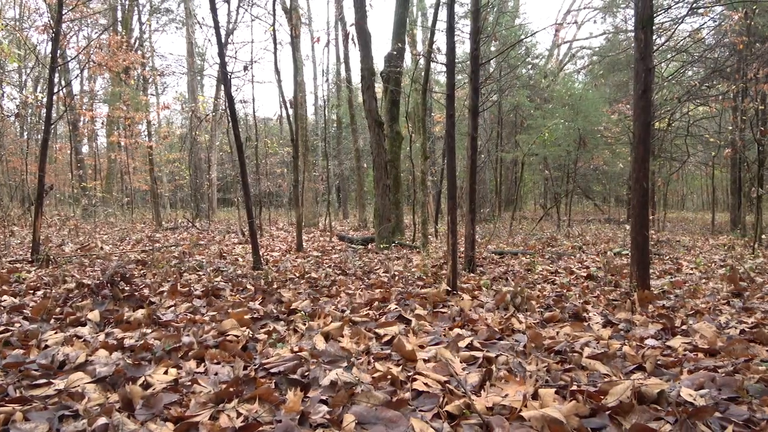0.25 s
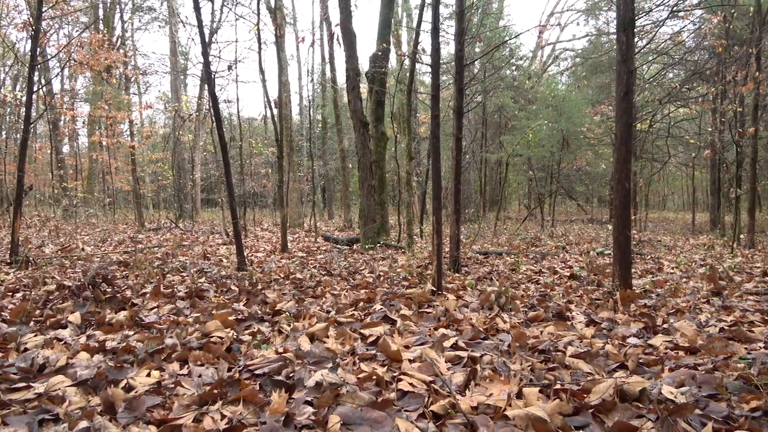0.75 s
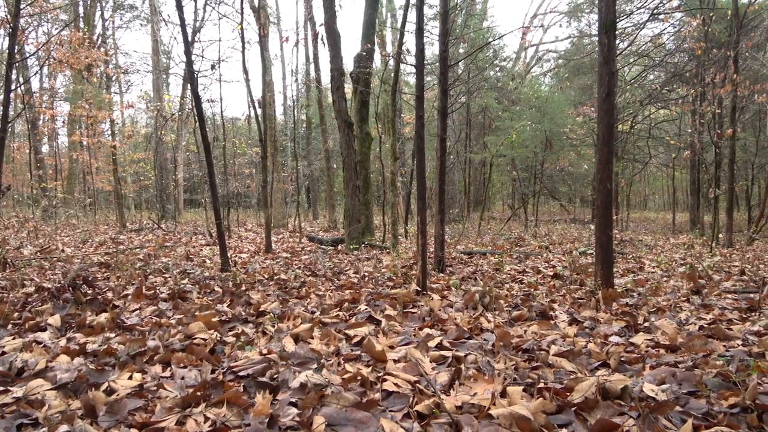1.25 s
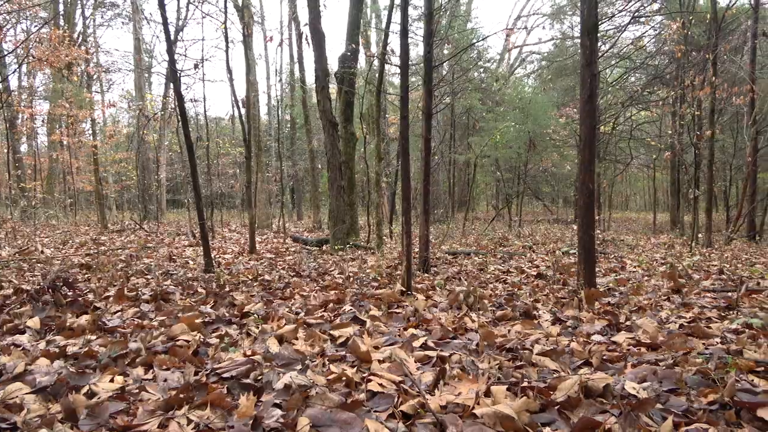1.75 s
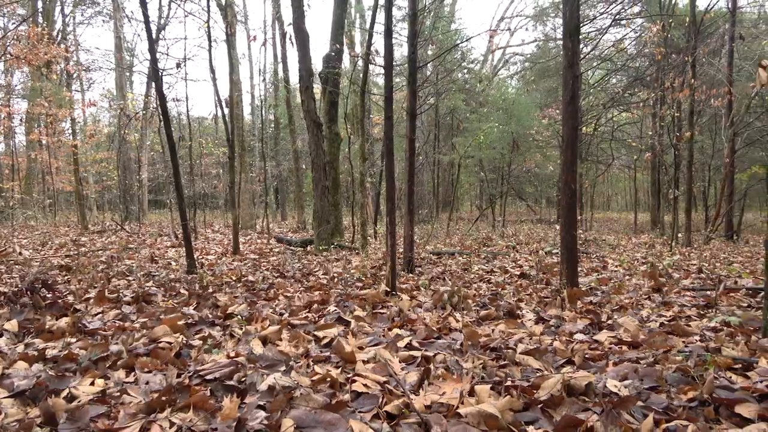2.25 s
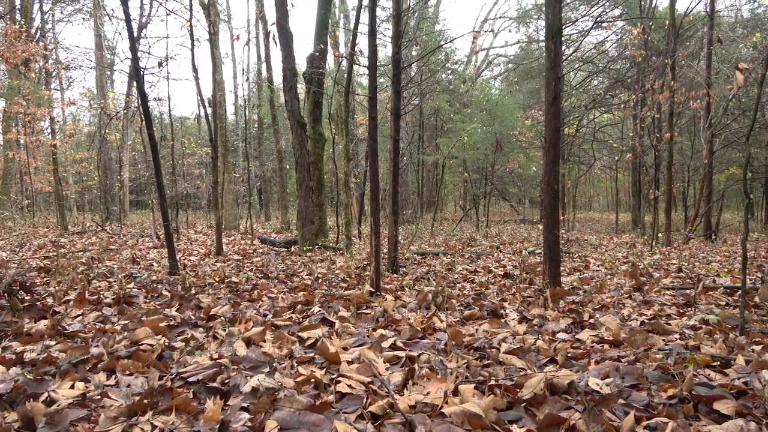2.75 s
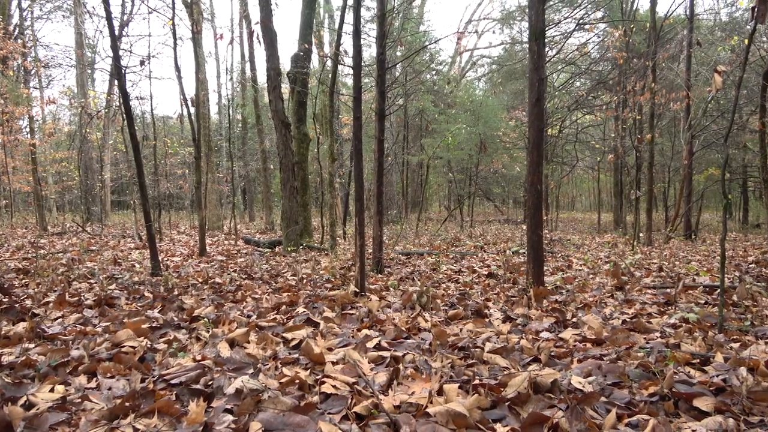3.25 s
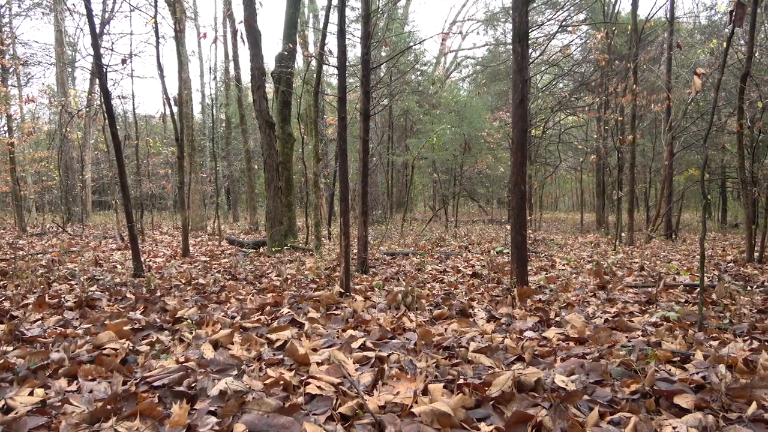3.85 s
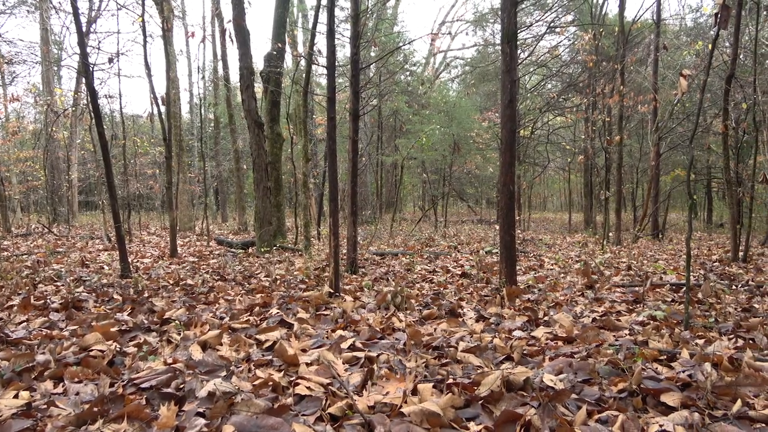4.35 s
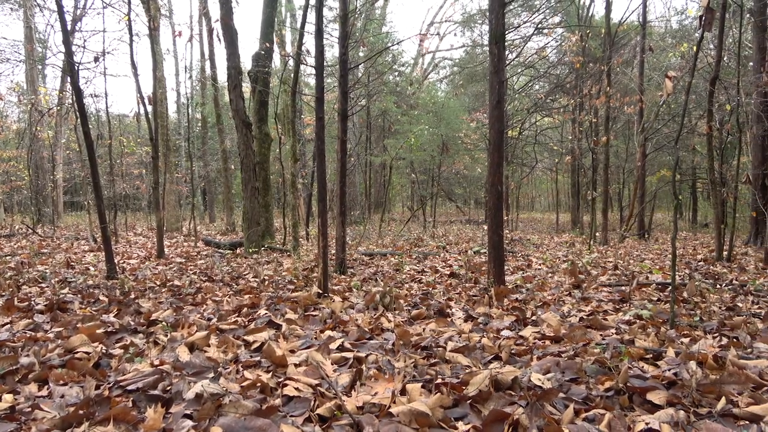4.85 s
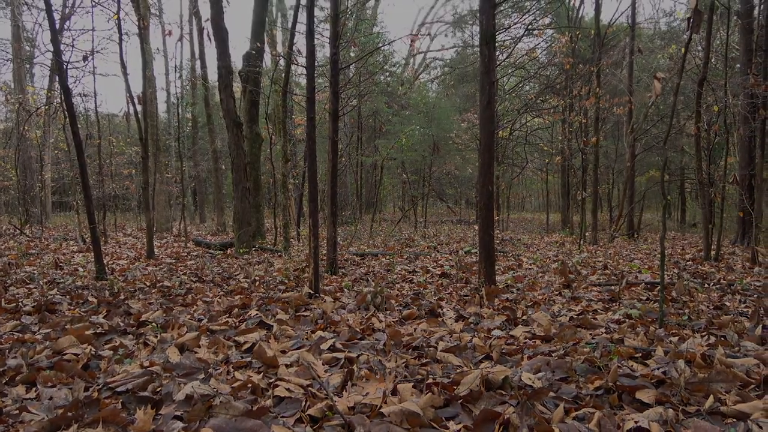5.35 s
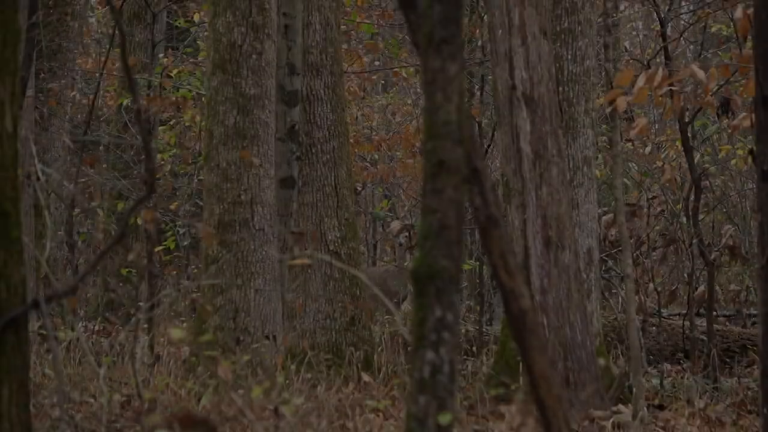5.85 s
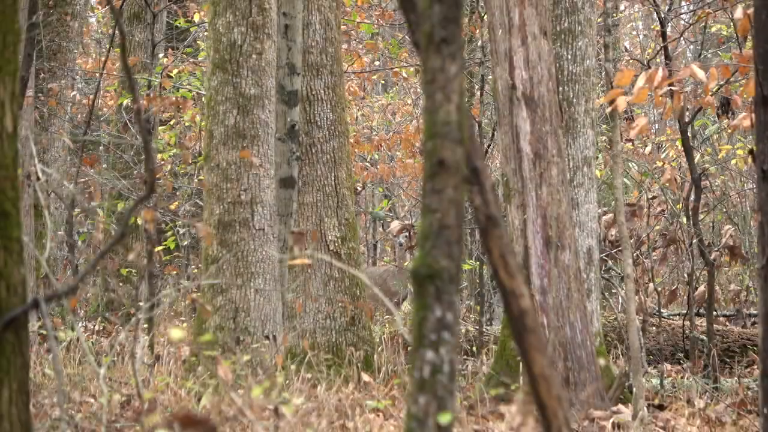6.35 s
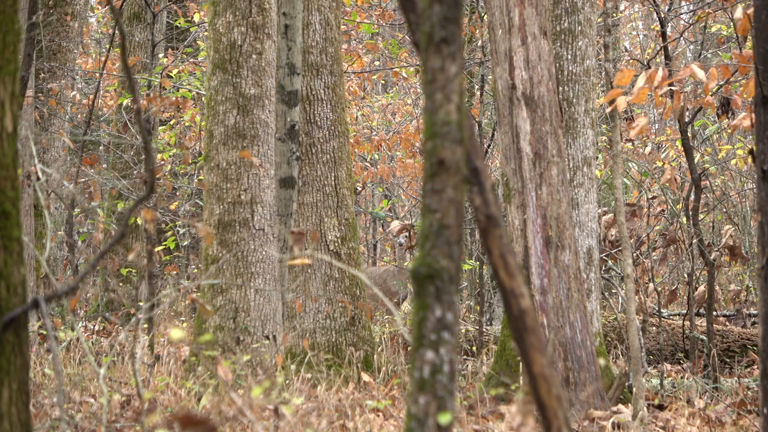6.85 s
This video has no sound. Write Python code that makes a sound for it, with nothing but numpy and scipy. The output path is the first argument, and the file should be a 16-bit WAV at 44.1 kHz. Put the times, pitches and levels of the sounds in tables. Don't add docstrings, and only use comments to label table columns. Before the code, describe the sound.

Sparse small bird whistles and clucks echo through a quiet wood over a faint traffic rumble; one sharp leaf snap, later a distant hoarse jay.

```python
import sys
import numpy as np
from scipy import signal
from scipy.io import wavfile
from scipy.ndimage import uniform_filter1d

SR = 44100
rng = np.random.default_rng(int(sys.argv[2]) if len(sys.argv) > 2 else 0)


def to_linear_factor(level_db):
    exponent = np.asarray(level_db, float) / 20
    return 10 ** exponent


def dump(signal):
    limited = np.clip(np.atleast_2d(signal).T, -1, 1)
    pcm = np.round(limited * 32767).astype(np.int16)
    wavfile.write(sys.argv[1], SR, pcm)


N = 313992


def evened(x):
    return x / np.sqrt(np.mean(x ** 2) + 1e-20)


def drift(count, size):
    return evened(uniform_filter1d(uniform_filter1d(rng.standard_normal(count), size=size), size=size))


def columns(rows, t):
    s, *rest = np.transpose(rows)
    return [np.interp(t, s, c) for c in rest]


def add(mix, s, sound):
    part = mix[round(s * SR):][:len(sound)]
    part += sound[:len(part)]


def bell(t, peak_s, half_s):
    return np.exp(-abs((t - peak_s) / half_s) ** 2.6)


def resonate(x, hz, width):
    turn = np.exp(2j * np.pi * np.cumsum(hz * np.ones(len(x))) / SR)
    r = np.exp(-np.pi * width / SR)
    return 2 * (turn * signal.lfilter([1 - r], [1, -r], x / turn + 1e-18)).real


def tone(hz, orders_db, edge_s=1):
    turn = 2 * np.pi * np.cumsum(hz) / SR
    wave = sum(to_linear_factor(db) * np.sin((k + 1) * turn) for k, db in enumerate(orders_db))
    return np.sqrt(2) * wave * signal.windows.tukey(len(hz), min(.35, 2 * edge_s * SR / len(hz)))


def swelling(hz, t):
    # (centre [Hz], spread [log ratio])
    bands = [
        (24, .4),
        (315, 0.55),
        (620, 0.37),
        (2400, 0.57),
        (182, 0.18),
        (1330, 0.1),
    ]
    # (band counted from 0, peak [s], half length [s], rise [dB])
    swells = [(0, .02, .08, 12), (0, .8, .5, 7.5), (0, 1.57, .12, 7), (0, 2.15, .3, 10), (0, 2.62, .1, 14),
              (0, 4.12, 0.24, 9), (0, 5.13, 0.15, 8), (0, 5.49, .08, 9), (0, 6.7, .5, -5),
              (1, 2.37, .35, 2), (1, 5.77, 0.39, 6), (2, 2.38, 0.29, 4), (2, 4.42, .15, 2), (2, 5.6, .2, 2),
              (2, 6.6, 0.85, -2), (3, 1.1, 0.43, 2.5), (3, 2.2, 0.15, -3), (3, 4.12, 0.21, 3),
              (3, 5.35, 0.13, 4), (3, 5.945, 0.26, 8), (4, 6.3, .8, -4)]
    log_hz = np.log(hz[:, None] + 1)
    reach = [np.exp(-((log_hz - np.log(centre_hz)) / spread) ** 2) for centre_hz, spread in bands]
    steady_db = [-2.5, 0.8, 1.1, 0.54, 0.4, 1.4]
    gap_db = -1.9 * np.exp(-((log_hz - np.log(42)) / 0.31) ** 2)
    field_db = gap_db + sum(r * db for r, db in zip(reach, steady_db))
    for band, peak_s, half_s, db in swells:
        field_db = field_db + reach[round(band)] * db * bell(t, peak_s, half_s)
    return field_db


def hiss(spectrum, patchy_db, swells=False):
    frames, hz = N // 512 + 5, np.fft.rfftfreq(2048, 1 / SR)
    a, b, patches = rng.standard_normal((frames, len(hz), 3)).T
    patches = evened(uniform_filter1d(uniform_filter1d(patches, size=20, axis=0), size=8, axis=1))
    f, level_db = np.transpose(spectrum)
    field_db = np.interp(np.log(hz + 1), np.log(f + 1), level_db)[:, None] + patchy_db * patches
    if swells:
        field_db += swelling(hz, np.arange(frames) * 512 / SR)
    return evened(signal.istft((a + 1j * b) * to_linear_factor(field_db), nperseg=2048, noverlap=1536)[1][:N])


def port_hiss():
    # (frequency [Hz], density [dB per Hz])
    ports = [(12, -16), (20, -3), (58, -9), (134, -23), (434, -4.5), (1000, -9.5), (1610, -13),
             (2460, -10.5), (5380, -10.5), (7110, -7.5), (11000, -5.5), (16000, -7.5)]
    return to_linear_factor(-64.5) * hiss(ports, 0.71)


def wood_air():
    # (frequency [Hz], density [dB per Hz])
    air = [(12, -33), (20, -3.5), (74, 0), (123, -1), (150, -4.5), (216, -14.5), (310, -19), (738, -21.5),
           (2600, -29.5), (4540, -29), (5230, -29.5), (5850, -32), (7730, -36.5), (14700, -38),
           (16000, -34)]
    return to_linear_factor(-42) * hiss(air, 0.96, swells=True)


def drones():
    # (pitch [Hz], or 1 to follow the gear; width [Hz])
    engines = [
        (84.55, 2.5),
        (101.6, 1.33),
        (1, 3),
        (160.2, 1.5),
    ]
    # (time [s], pitch [Hz])
    gear = [
        (0, 120.7),
        (4.3, 120.2),
        (4.5, 131.9),
        (5.5, 132.2),
        (5.8, 122),
    ]
    idle_db = [-57, -63, -60, -64]
    # (engine counted from 0, nearest [s], half length [s], level [dB])
    passes = [(0, 0.27, 0.092, -38.5), (0, 0.55, 0.17, -38.5), (0, 1.55, .45, -45), (0, 2.46, 0.21, -47.5),
              (0, 4.38, .16, -42.5), (0, 5.08, 0.12, -49), (0, 6.43, 0.99, -45), (1, 0.33, .2, -53),
              (1, 1.95, 0.073, -45), (1, 3.24, 0.13, -52), (1, 4.08, .14, -51), (1, 5.2, 0.37, -50),
              (1, 5.68, .08, -44), (1, 6.42, 0.71, -36.5), (2, .2, .3, -48), (2, 1.2, 0.27, -51),
              (2, 2.9, 1.0, -51), (2, 4.64, .15, -44.5), (2, 5.04, 0.25, -44), (2, 5.6, .4, -55),
              (2, 6.92, .12, -51), (3, .4, .12, -53), (3, 1.45, 0.39, -52.5), (3, 2.57, 0.54, -48),
              (3, 3.96, 0.32, -45.5), (3, 4.96, 0.23, -46)]
    t, out = np.arange(N) / SR, 0
    levels = to_linear_factor(idle_db)[:, None] * np.ones(N)
    for engine, s, half_s, db in passes:
        levels[round(engine)] += to_linear_factor(db) * bell(t, s, half_s)
    for (hz, width), level in zip(engines, levels):
        hz = hz if hz > 2 else columns(gear, t)[0]
        halo = evened(resonate(resonate(rng.standard_normal(N), hz, 3 * width), hz, 3 * width))
        line = np.sqrt(2) * np.sin(2 * np.pi * np.cumsum(hz + .2 * width * drift(N, 9000)) / SR)
        out = out + to_linear_factor(-3.0) * level * (0.82 * line + 0.4 * halo)
    return out


def insects():
    hz, width = 5280, 300
    return to_linear_factor(-66.5) * evened(resonate(resonate(rng.standard_normal(N), hz, width), hz, width))


def trees(x, t60):
    taps = np.zeros(SR)
    at = np.arange(100, SR - 20, 20) + rng.integers(0, 20, (SR - 101) // 20)
    taps[at] = rng.choice([-1., 1.], len(at)) * to_linear_factor(-60 * at / SR / t60)
    return signal.fftconvolve(x, taps / np.linalg.norm(taps))[:N]


def jay_scold():
    # (time [s], level [dB], upper throat [Hz])
    voice = [(5.655, -55, 3180), (5.69, -46.5, 3120), (5.74, -48.5, 2930), (5.985, -45, 3230),
             (6.115, -45, 3490), (6.185, -49, 3470), (6.403, -51, 3640), (6.55, -55.5, 3600),
             (6.98, -55.5, 3700)]
    # (time [s], length [s], start [Hz], end [Hz], level [dB])
    strands = [(5.67, 0.247, 3130, 3170, -53), (5.84, .14, 3250, 3320, -51.5), (5.9, 0.14, 3540, 3520, -51),
               (6.11, 0.143, 3570, 3470, -51.5), (5.7, 0.11, 2920, 2900, -59),
               (5.85, 0.25, 2850, 2800, -57), (5.74, 0.141, 1750, 1800, -61), (5.94, .08, 2000, 2200, -59),
               (6.02, 0.12, 2080, 2000, -57), (6.14, 0.122, 1780, 1720, -60), (5.6, 0.042, 1320, 1260, -57),
               (6.14, 0.122, 1220, 1100, -60), (6.18, 0.144, 3950, 4000, -64),
               (6.27, .13, 1440, 1400, -62.5)]
    t = np.arange(voice[0][0], voice[-1][0], 1 / SR)
    db, throat_hz = columns(voice, t)
    jitter = uniform_filter1d(rng.standard_normal(len(t)), size=150)
    turns = np.cumsum(190 * (1 + 1.2 * jitter)) / SR
    puffs = (0.53 + np.exp(-(turns % 1) / 0.33)) * rng.standard_normal(len(t))
    upper = resonate(resonate(puffs, 0.98 * throat_hz, 1200), throat_hz, 1200)
    upper = evened(resonate(upper, 2900, 1700))
    lower = evened(resonate(resonate(puffs, 2100, 900), 2100, 900))
    flutter = evened(uniform_filter1d(rng.standard_normal(len(t)), size=1500))
    lower_db = -5 - 4.5 * (t - t[0]) + 3 * flutter
    out = np.zeros(N)
    add(out, t[0], to_linear_factor(db - 3.0) * (upper + to_linear_factor(lower_db) * lower) * signal.windows.tukey(len(t), .02))
    unsteady = rng.standard_normal(SR)
    for s, length, start_hz, end_hz, strand_db in strands:
        hz = np.linspace(start_hz, end_hz, round(length * SR))
        breath = np.roll(unsteady, -round(start_hz))[:len(hz)]
        breath = evened(resonate(breath, hz, 40)) * np.hanning(len(hz))
        add(out, s, to_linear_factor(strand_db + 3.0) * (0.6 * tone(hz, [0]) + 0.66 * breath))
    return out


def jay_note():
    hz, length = 1592, .1
    return to_linear_factor(-62) * tone(np.linspace(hz, .995 * hz, round(length * SR)), [-15, 0, -15])


def clucks():
    # (time [s], head [dB], plateau [dB], fall [dB], low arch [dB])
    calls = [(0.101, -82, -78, -85, -67.5), (.892, -65, -61.5, -65, -64.5), (1.202, -63, -77, -67, -62.5),
             (1.52, -63, -70, -67, -64.5), (4.375, -62, -69, -68, -68), (4.722, -63, -65, -67, -68),
             (5.085, -64, -63.5, -72, -72)]
    # (delay [s], length [s], start [Hz], middle [Hz], end [Hz])
    parts = [
        (0, .018, 3800, 4050, 4350),
        (.011, .018, 3500, 3300, 3050),
        (.022, .024, 2900, 2550, 2200),
        (.002, .045, 1280, 1580, 1230),
    ]
    out = np.zeros(N)
    for s, *levels_db in calls:
        detune = 1 + .02 * rng.standard_normal()
        for (delay, length, start_hz, middle_hz, end_hz), db in zip(parts, levels_db):
            u = np.linspace(-1, 1, round(length * SR))
            arch = ((end_hz + start_hz) / 2 - middle_hz) * u ** 2
            bend = middle_hz + (end_hz - start_hz) / 2 * u + arch
            add(out, s + delay, to_linear_factor(db + 2.0) * tone(bend * detune, [0]))
    return out


def whistles():
    # (time [s], length [s], start [Hz], end [Hz], level [dB])
    near = [(0.721, .055, 422, 420, -62), (1.067, 0.035, 417, 420, -60.5), (3.488, 0.015, 9750, 9650, -68),
            (3.517, .013, 7350, 7250, -57.5), (4.848, 0.16, 2734, 2750, -70.5),
            (5.346, 0.051, 2290, 2285, -60.5)]
    middle = [(.62, .12, 6430, 6350, -76), (2.2, .2, 700, 624, -67.5), (2.43, .043, 2110, 2163, -65.5),
              (3.502, 0.021, 9000, 7200, -66), (3.597, .015, 4300, 2300, -60),
              (3.92, .043, 2240, 2166, -64), (6.42, 0.13, 3646, 3600, -67), (6.6, .11, 3600, 3650, -74),
              (6.89, .05, 7100, 7020, -69), (6.95, .16, 7050, 7050, -79)]
    far = [(1.36, .06, 7650, 7420, -78), (.742, 0.028, 3930, 4100, -76), (.799, .03, 4400, 3590, -75),
           (.84, .03, 3600, 4320, -76), (3.8, .3, 4240, 4400, -83.5), (4.05, .06, 2400, 1890, -80),
           (4.17, 0.059, 2360, 2050, -81), (5.271, .032, 3210, 2600, -68), (5.351, 0.017, 3000, 4260, -70)]
    # (time [s], hold [s], top [Hz], bottom [Hz], level [dB])
    slides = [(.223, 0, 7500, 7160, -76), (2.28, 0.081, 8700, 7900, -76), (3.3, 0.0023, 9240, 7120, -58),
              (4.459, .045, 8850, 7400, -67.5), (5.065, 0, 8800, 7650, -72.5)]
    # (time [s], pitch [Hz], level [dB])
    chip = [
        (3.66, 6020, -55),
        (3.667, 6950, -51),
        (3.686, 6500, -53),
        (3.699, 5250, -54),
    ]
    hook = [
        (5.562, 8200, -69),
        (5.575, 6940, -54),
        (5.594, 7300, -52),
        (5.6, 7010, -65),
        (5.75, 7070, -75),
    ]
    for notes, echo_db in [(near, -5.5), (middle, 1.5), (far, 12.5)]:
        for s, length, start_hz, end_hz, db in notes:
            hz = np.linspace(start_hz, end_hz, round(length * SR))
            yield s, hz, db, echo_db, hz.max() < 5000
    slide_s = .062
    for s, hold, top_hz, bottom_hz, db in slides:
        t = np.arange(-hold, slide_s, 1 / SR)
        hz = np.interp(t, [0, slide_s], [top_hz, bottom_hz])
        shape_db = np.interp(t, [-.01, .005, slide_s / 2, slide_s], [-3.5, 0, 0, -5])
        yield s, hz, db + shape_db, 8.5, False
    for curve, echo_db, overtone in [(chip, -12, False), (hook, 3.5, True)]:
        start_s = curve[0][0]
        hz, db = columns(curve, np.arange(start_s, curve[-1][0], 1 / SR))
        yield start_s, hz, db, echo_db, overtone


def birds():
    direct, sent = np.zeros((2, N))
    for s, hz, db, echo_db, overtone in whistles():
        note = to_linear_factor(db) * tone(hz, [0, -18 if overtone else -90], 0.004)
        add(direct, s, note)
        add(sent, s, to_linear_factor(echo_db) * note)
    cluck = clucks()
    direct, sent = direct + cluck, sent + to_linear_factor(-0.5) * cluck
    note = jay_note()
    add(direct, 5.255, note)
    add(sent, 5.255, to_linear_factor(-6.0) * note)
    shimmer_db = 3.5 * drift(N, 200)
    return to_linear_factor(6.9 + .55 * shimmer_db) * direct, to_linear_factor(5 + shimmer_db) * sent


def drops():
    # (time [s], peak [dB], extra low body [dB])
    falls = [
        (1.4478, -2.8, 0),
        (1.968, -44, 6),
        (2.864, -43, 0),
        (3.6, -37, 3),
        (3.669, -33, 9),
        (5.145, -35, 0),
        (5.272, -32.5, 10),
    ]
    # (frequency [Hz], width [Hz], level [dB])
    leaf = [
        (4100, 1080, -1.5),
        (1940, 2100, -4.5),
        (4400, 220, -22),
        (11800, 3200, -2),
    ]
    # (delay [s], level [dB])
    bounces = [(.0016, -24), (.0024, -23), (.012, -43)]
    u = np.arange(-12, 600) / (SR * .000058)
    push = u * np.exp(-u ** 2 / 2) + 0.2 * (np.arange(len(u)) == 12)
    edge, body, *rest = [to_linear_factor(db) * resonate(push, hz, width) / width for hz, width, db in leaf]
    out = np.zeros(N)
    for s, db, body_db in falls:
        snap = edge + to_linear_factor(body_db) * body + sum(rest)
        snap = snap / abs(snap).max()
        add(out, s + 0.000067, to_linear_factor(db + 0.011) * snap)
        for delay, bounce_db in bounces:
            add(out, s + delay, to_linear_factor(db + bounce_db) * snap)
    return out


def scene():
    background = wood_air() + drones() + insects()
    side = port_hiss()
    jay = jay_scold()
    direct, sent = birds()
    leaf = drops()
    open_wood = np.arange(N) < 5.5 * SR
    echoes = to_linear_factor(-3) * trees(sent * open_wood, 0.3) + to_linear_factor(-2.5) * trees(sent * open_wood, 0.85)
    echoes = echoes + trees(sent * ~open_wood + to_linear_factor(-4.5) * jay, 0.42)
    leaf = leaf + to_linear_factor(-28) * trees(leaf, 0.035)
    mid = background + direct + echoes + to_linear_factor(-1.5) * jay + leaf
    return np.array([mid + side, mid - side])


def band_limit(x):
    return signal.sosfilt(signal.butter(12, 17000, fs=SR, output="sos"), x)


def record(dry):
    lowpass = signal.firwin(801, 15700, window=("kaiser", 6), fs=SR)
    limited = signal.oaconvolve(dry, lowpass[None], "same")
    return band_limit(limited)


dry = scene()
out = record(dry)
dump(out)
```